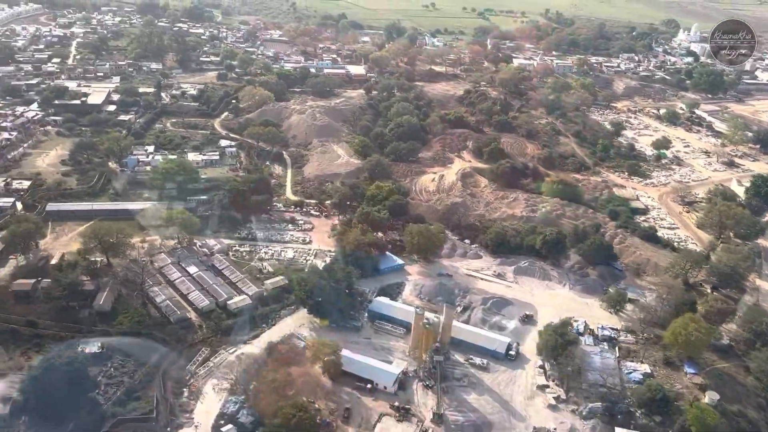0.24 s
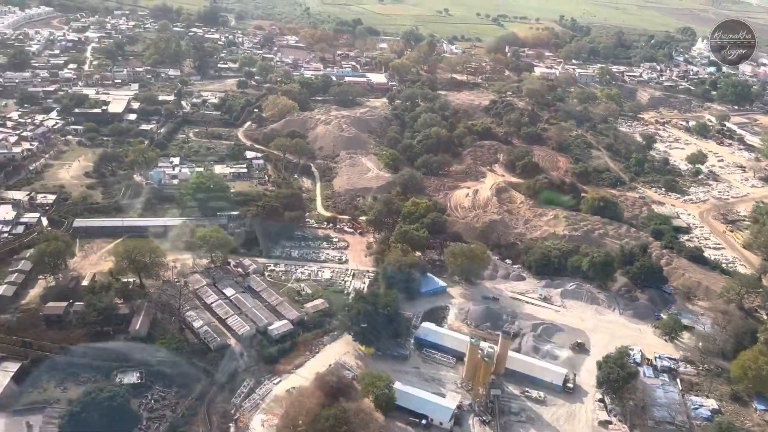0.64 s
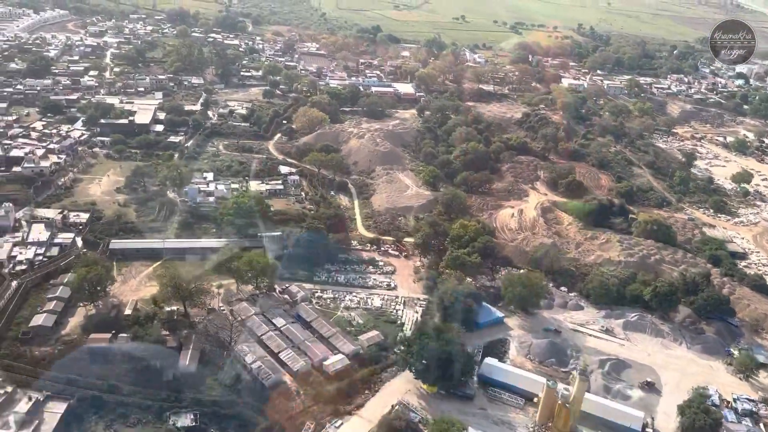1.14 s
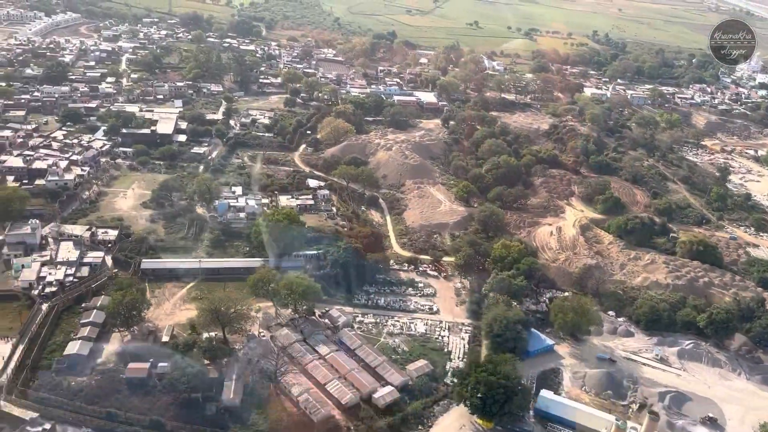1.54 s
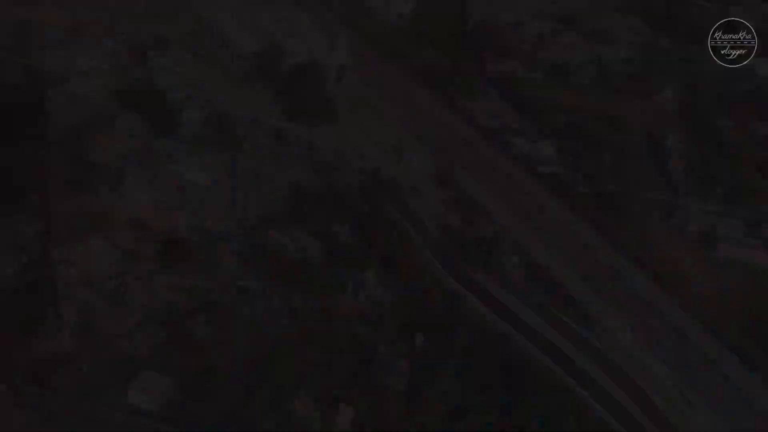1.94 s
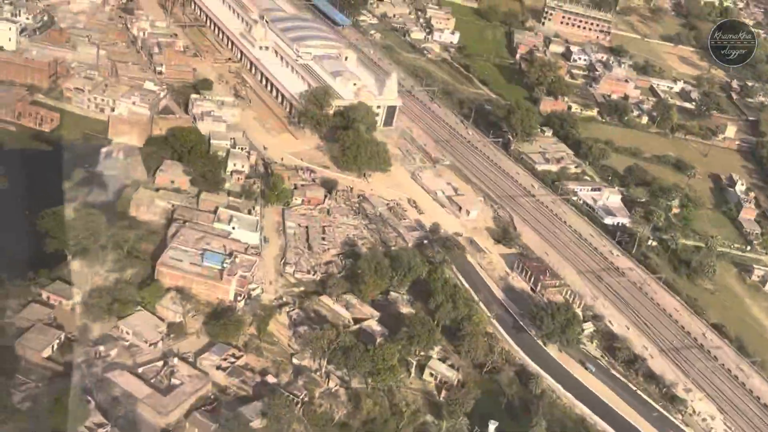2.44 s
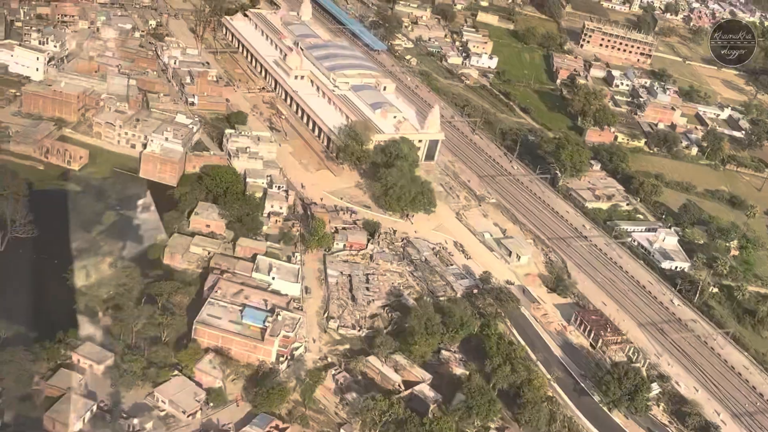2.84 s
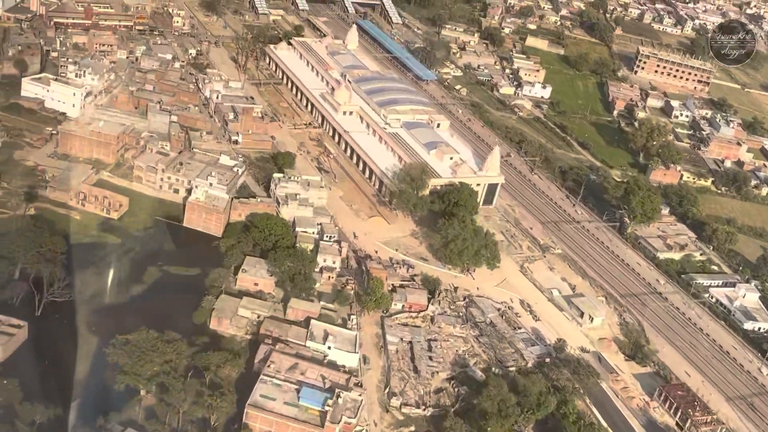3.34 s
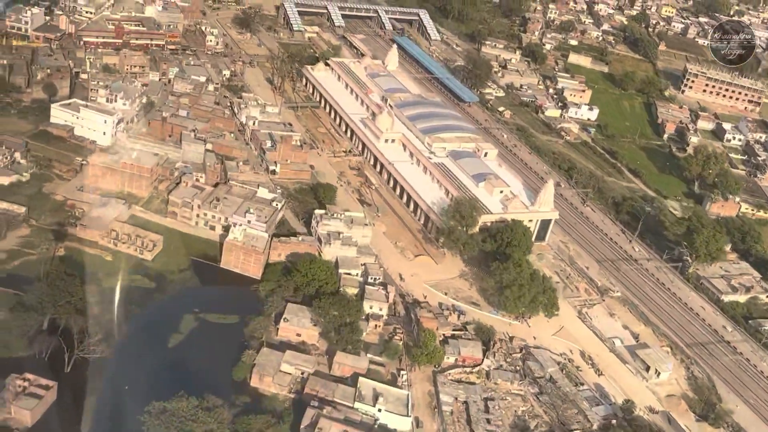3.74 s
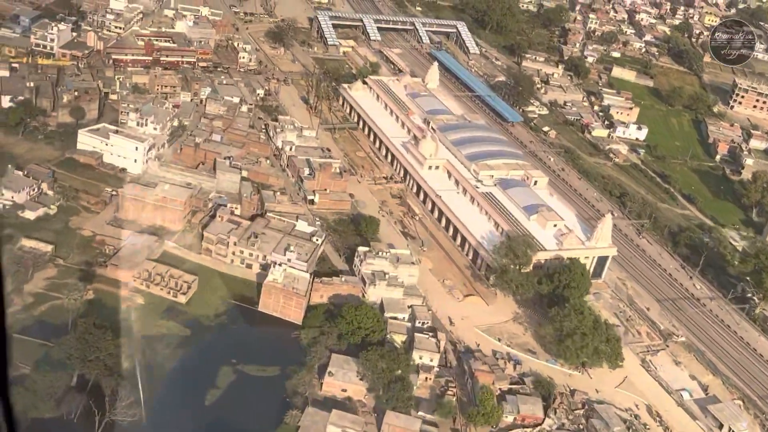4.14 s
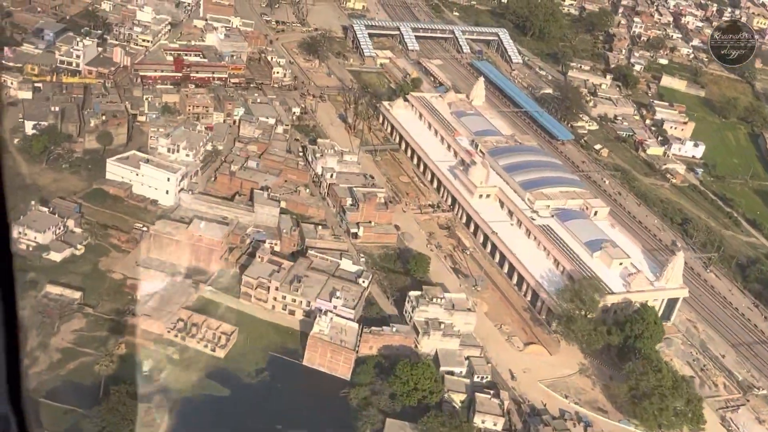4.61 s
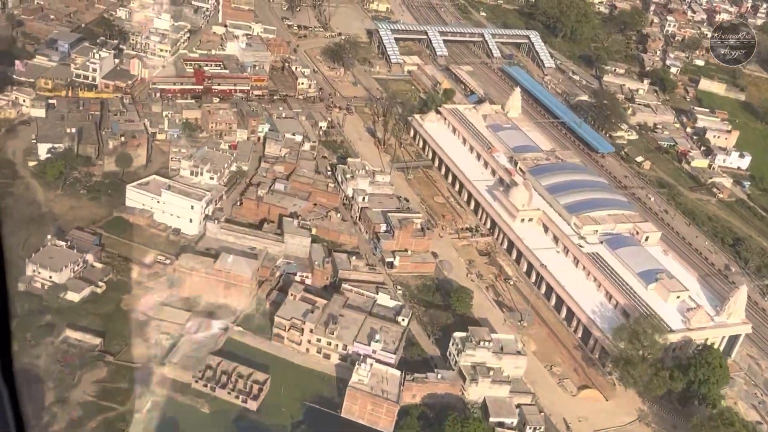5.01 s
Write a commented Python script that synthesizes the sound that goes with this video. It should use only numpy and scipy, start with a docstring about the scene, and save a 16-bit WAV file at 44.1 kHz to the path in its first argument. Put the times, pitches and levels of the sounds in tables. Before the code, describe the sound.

Heard from inside a flying helicopter, rapid blade beats blur into a heavy, bassy drone. Air hisses and spits through a window gap on each pass, over unsteady gear whine and brief resonant swells. The first passage fades out by two seconds; another rises at once, starting with less hiss and howl, then slowly building. The microphones sit in the cramped cabin, with wide, uneven stereo treble.

```python
"""A fast throb, some 19 beats a second, inside a cruising helicopter, miked at two ports in the cabin.
Two stretches of flight follow each other, the first fading out and the second fading in.
The throb is a stack of main rotor harmonics over coloured noise for the turbulent cabin rumble.
Each blade pushes a chuff of noise and ringing tones through a window gap that hisses and squeaks.
Gearbox and turbine whine in steady tones and howl in wandering bands; other narrow bands swell briefly."""
import sys
import numpy as np
from scipy import signal
from scipy.fft import rfft, irfft, next_fast_len
from scipy.io import wavfile

SR = 44100
rng = np.random.default_rng(int(sys.argv[2]) if len(sys.argv) > 2 else 0)


def unload_audio(sound):
    """Save the sound as a 16-bit wav file, at the path given as the first command line argument."""
    columns = np.transpose(np.atleast_2d(sound))
    # keep every value between -1 and 1, then stretch to whole-number steps
    steps = np.round(np.clip(columns, -1, 1) * 32767)
    wavfile.write(sys.argv[1], SR, steps.astype(np.int16))


N = 232495
T = np.arange(N) / SR   # time [s]
HZ = np.maximum(np.fft.rfftfreq(next_fast_len(N + N % 2, True), 1 / SR), 1)   # spectrum bins [Hz]
FFT_SIZE = 2 * len(HZ) - 2
LEFT_RIGHT = np.array([[.5], [-.5]])   # splits a left-right difference evenly between the ports


def from_db(db):
    """Decibels to gain."""
    return 10 ** (np.asarray(db) / 20)


def in_time(rows):
    """The columns of a curve at every sample."""
    s, *columns = np.transpose(rows)
    return [np.interp(T, s, column) for column in columns]


def in_frequency(rows):
    """The columns of a spectrum at every bin, joined along log frequency."""
    hz, *columns = np.transpose(rows)
    return [np.interp(np.log(HZ), np.log(hz), column) for column in columns]


def white():
    """The spectrum of white noise with unit power per Hz."""
    return rfft(rng.standard_normal(FFT_SIZE)) * np.sqrt(SR / 2)


def drift(rate_hz, count=32):
    """Slow chance with a spread of 1, drawn every count samples and joined by straight lines."""
    steps = np.arange(next_fast_len(N // count + 2)) * count
    hz = np.fft.rfftfreq(len(steps), count / SR)
    lowpass = 1 / (1 + (hz / rate_hz) ** 4)
    slow = irfft(rfft(rng.standard_normal(len(steps))) * lowpass, len(steps))
    return np.interp(np.arange(N), steps, slow / np.std(slow))


def wander(rate_hz):
    """Slow chance in both strength and phase."""
    return drift(rate_hz) + 1j * drift(rate_hz)


def at_ports(db_per_hz, ports):
    """Noise of a given colour as the two microphone ports hear it: partly shared, partly their own."""
    likeness, lead_rad, balance_db = in_frequency(ports)
    likeness = np.clip(likeness, 0, 1)
    shared = np.sqrt(likeness) * white() * np.exp(1j * lead_rad * LEFT_RIGHT)
    own = np.sqrt(1 - likeness) * np.array([white(), white()])
    return irfft((shared + own) * from_db(db_per_hz + balance_db * LEFT_RIGHT))[:, :N]


def since_blade(blades, delay_s=0):
    """Seconds before (negative) or after the nearest blade pass."""
    per_s, first_s = blades
    passes = (T - first_s - delay_s) * per_s
    return ((passes + .5) % 1 - .5) / per_s


def each_blade(blades):
    """A chance value that holds for one blade pass; spread about 1."""
    per_s, first_s = blades
    passes = np.round((T - first_s) * per_s).astype(int)
    values = np.sqrt(3) * rng.uniform(-1.1, 1, np.ptp(passes) + 1)
    return values[passes - passes[0]]


def rumble(blades, air, spectrum, cabin, ports, flutter_db=0.5, buffet_db=0.5, buffet_hz=12,
           panel_hz=480, follows_air=0.63):
    """Turbulence shakes the panels, the cabin colours it; the bass surges, the rush follows the airflow."""
    colour_db, = in_frequency(spectrum)
    for hz, width_hz, peak_db in cabin:
        colour_db = colour_db + peak_db / (1 + (2 * (HZ - hz) / width_hz) ** 2)

    # bass and rush cross over at panel_hz
    steepness = (HZ / panel_hz) ** 4
    bass = at_ports(colour_db - 10 * np.log10(1 + steepness), ports)
    rush = at_ports(colour_db - 10 * np.log10(1 + 1 / steepness), ports)

    downwash = np.cos(2 * np.pi * blades[0] * since_blade(blades, delay_s=0.0035))
    surge_db = flutter_db * downwash + buffet_db * drift(buffet_hz)
    airflow_db = in_time(air)[0] - np.mean(np.array(air)[:, 1])
    return bass * from_db(surge_db) + rush * from_db(follows_air * airflow_db)


def swells(steady=0.86, noisy_cycles=6.5, lead_rad_per_hz=0.00037):
    """Bands swell and die in a bell: short narrow ones tonal, long wide ones noisy; phase gap grows with Hz."""
    # narrow bands out of the drone, from low booms to thin whistles:
    # (time [s], half length [s], centre [Hz], width [Hz], level before the fades [dB rms])
    swell_rows = [(0.177, 0.084, 368, 12, -28), (.66, .07, 2040, 30, -48.5), (.72, .06, 3380, 35, -52),
                  (.8, 0.7, 1207, 18, -52), (1.05, .45, 1850, 300, -51), (0.947, 0.079, 401.5, 11, -30),
                  (1.05, .07, 369.6, 11, -29), (1.25, 0.051, 401, 11, -27), (1.27, .09, 2450, 150, -45),
                  (1.29, .06, 250, 10, -23), (1.34, 0.14, 105.3, 8.5, -20.5), (1.411, .17, 4750, 220, -49),
                  (1.41, .06, 1935, 30, -45.5), (1.766, 0.045, 1670, 22, -43), (2.156, 0.12, 380, 11, -26),
                  (2.55, 0.24, 160, 15, -28.5), (2.854, 0.059, 169.3, 12, -21), (3.08, .1, 106, 7.5, -26),
                  (3.207, .09, 376, 11, -29.5), (3.3, .08, 95, 8.3, -20), (3.5, 0.12, 78.14, 9, -22.5),
                  (3.626, 0.22, 376.5, 9, -30.5), (3.918, 0.055, 269, 10, -25), (4.1, .17, 165, 15, -26.5),
                  (3.97, 0.09, 107, 9.9, -25), (4.074, .06, 1318, 17, -42.5), (4.2, .1, 2270, 90, -46),
                  (4.65, .07, 1211, 16, -40), (4.657, .1, 155.2, 12, -23.5), (4.95, .35, 2233, 200, -46.5),
                  (4.75, 0.51, 798, 70, -44), (4.955, 0.071, 215, 8.4, -23.5)]
    out = np.zeros((2, N))
    for s, half_s, hz, width_hz, level_db in swell_rows:
        near = np.abs(T - s) < 3 * half_s
        t = T[near]
        tonal = np.clip(steady, 0, 1) / (1 + (width_hz * half_s / noisy_cycles) ** 2)
        body = np.sqrt(tonal) + np.sqrt((1 - tonal) / 2) * wander(width_hz)[near]
        ring = np.real(body * np.exp(1j * hz * (2 * np.pi * t + lead_rad_per_hz * LEFT_RIGHT)))
        bell = np.exp(-((t - s) / half_s) ** 2)
        out[:, near] += np.sqrt(2) * from_db(level_db) * bell * ring
    return out


def whine(tones, waver=0.22, waver_hz=5):
    """Steady mesh tones; standing waves make them waver differently at each port."""
    out = np.zeros((2, N))
    for hz, level_db, balance_db in tones:
        for channel, side in enumerate((.5, -.5)):
            path = 1 + waver * wander(waver_hz)
            tone = np.real(path * np.exp(2j * np.pi * hz * T + 1j * side))
            out[channel] += np.sqrt(2) * from_db(level_db + side * balance_db) * tone
    return out


def howl(curve, level_db, likeness, width_hz, balance_db, offset_hz=0, waver_hz=13, broken_db=1.0):
    """A narrow band of gear noise whose centre wanders and undulates and whose level breaks up."""
    centre_hz, curve_db = in_time(curve)
    hz = centre_hz + offset_hz + waver_hz * drift(6.98)
    carrier = np.exp(2j * np.pi * np.cumsum(hz) / SR)
    mid = np.real(carrier * wander(width_hz))
    side = np.real(carrier * wander(width_hz))

    # likeness of the ports: 1 is equal, -1 is opposite
    likeness, signs = np.clip(likeness, -1, 1), 2 * LEFT_RIGHT
    pair = (np.sqrt(1 + likeness) * mid + np.sqrt(1 - likeness) * side * signs) / np.sqrt(2)
    return pair * from_db(curve_db + level_db + broken_db * drift(13) + LEFT_RIGHT * balance_db)


def squeaks(blades, level_db, centre_hz, lead_s, half_s=.0042, spread_hz=380, glide_hz_per_s=55000,
            uneven_db=5, rough=.4):
    """Just ahead of a blade the gap whistles for an instant, each time with its own pitch, glide, strength."""
    age = since_blade(blades, delay_s=-lead_s * (1 + .5 * each_blade(blades)))
    hz = centre_hz + spread_hz * each_blade(blades) + glide_hz_per_s * each_blade(blades) * age
    carrier = np.exp(2j * np.pi * np.cumsum(hz) / SR)
    tone = np.sqrt(2) * np.real(carrier * (1 + rough * wander(250)))
    opposite_ports = 2 * LEFT_RIGHT
    bell = np.exp(-(age / half_s) ** 2)
    return opposite_ports * tone * bell * from_db(level_db + uneven_db * each_blade(blades))


def gusts():
    """Extra push of the air in dB: each gust swells and dies away as a bell."""
    # gusts, in which the blades chuff harder: (time [s], half length [s], extra level [dB])
    gust_rows = [(0.092, .06, 4.5), (.25, 0.08, 3.5), (.43, 0.069, 4), (.52, 0.034, 3), (.73, .06, 0.5),
                 (.94, 0.063, 3.5), (1.154, 0.033, 5), (1.26, .05, 6), (1.41, .04, 2.5), (1.522, 0.056, 7),
                 (1.66, 0.032, 4.5), (1.76, .03, 2), (2.116, .04, 2), (2.195, .033, 9), (2.37, .03, 4),
                 (2.71, 0.037, 7.5), (2.9, .04, 1.5), (2.99, .03, 6.5), (3.197, 0.15, 4.5), (3.55, .1, 4),
                 (3.872, .15, 3.5), (4.204, 0.039, 7.5), (4.39, .025, 3), (4.798, 0.4, 4.5), (5.2, 0.07, 1)]
    return sum(extra_db * np.exp(-((T - s) / half_s) ** 2) for s, half_s, extra_db in gust_rows)


def standing_waves(count=12, longest_s=.012):
    """Short reflections off glass and panels ripple the spectrum; spread about 1."""
    delays_s = rng.uniform(0, longest_s, (count, 1))
    return np.cos(2 * np.pi * HZ * delays_s).sum(0) * np.sqrt(2 / count)


def gap_ring(spread_hz=170):
    """The gap's resonances: firm in strength, unsteady in pitch."""
    # resonances that every chuff rings in the gap:
    # (frequency [Hz], level before the ring and chuff levels [dB], left-right [dB])
    gap_modes = [(2400, 1.7, 2), (4930, -2.6, -.5)]
    out = 0
    for hz, level_db, balance_db in gap_modes:
        tone = np.cos(2 * np.pi * np.cumsum(hz + spread_hz * drift(209.5)) / SR)
        out = out + np.sqrt(2) * from_db(level_db + LEFT_RIGHT * balance_db) * tone
    return out


def window_gap(blades, air, gap, spread, hiss_db, chuff_db, ring_db, lead_db, decay_s, lead_s, rise_s=.0013,
               uneven_db=.5, flicker_db=0.66, ripple_db=0.77, chuff_follows_air=1.7, hiss_follows_gust=.03):
    """Air hisses through the gap, swells ahead of each blade, then spits a ringing chuff led by air and gusts."""
    air_db, gust_db = in_time(air)[0], gusts()
    mean_db = air_db.mean()
    hiss_colour, chuff_colour = in_frequency(gap) + ripple_db * standing_waves()

    ahead = np.exp(-(since_blade(blades, delay_s=-lead_s) / 0.0062) ** 2)
    hiss_level = air_db + hiss_follows_gust * gust_db + hiss_db
    hiss_level = hiss_level + lead_db * ahead + flicker_db * drift(45)
    hiss = at_ports(hiss_colour, spread) * from_db(hiss_level)

    age = since_blade(blades, delay_s=0.00046 * drift(6.6))   # the chuffs come slightly unevenly
    puff = np.exp(-np.where(age < 0, (age / rise_s) ** 2, age / decay_s))   # quick rise, slower fall
    chuff_level = mean_db + chuff_follows_air * (air_db - mean_db) + gust_db
    chuff_level = chuff_level + chuff_db + uneven_db * each_blade(blades)
    ringing = at_ports(chuff_colour, spread) + from_db(ring_db) * gap_ring()
    return hiss + ringing * puff * from_db(chuff_level)


def rotor(blades, throb, waver=0.15, right_db=2.0, smear_rad=1.3):
    """Blade pressure harmonics waver in turbulent air; the cabin smears each thump into a drone."""
    out, start_rad = 0, 2 * np.pi * rng.random()
    for order, level_db in enumerate(throb, 1):
        phase = 2 * np.pi * order * blades[0] * T + smear_rad * order ** 2 + start_rad
        wave = np.real(np.exp(1j * phase) * (1 + waver * wander(2.3)))
        out = out + np.sqrt(2) * from_db(level_db) * wave
    return out * from_db(-right_db * LEFT_RIGHT)


def first_stretch():
    """Flight in a nearly steady airflow, with a lower gear band that swells."""
    # blade passes: (rate [per s], time of one pass [s])
    blades = (19.357, .0041)
    # rotor harmonics at 1, 2, 3 .. times the blade rate: level before waver and balance [dB rms]
    throb = [-55, -29, -29, -24, -33, -32.5, -37.5, -38]
    # airflow past the cabin: (time [s], level before the gap's offsets [dB])
    air = [(0, -42.5), (.9, -42), (1.3, -42), (1.55, -42.5), (1.95, -43)]
    # cabin rumble: (frequency [Hz], level [dB per Hz])
    spectrum = [(15, -72), (30, -54), (48, -48), (66, -40.5), (105, -40), (160, -42), (215, -45),
                (320, -49), (510, -51.5), (720, -60), (1000, -64), (1550, -68.5), (2100, -73.5),
                (3500, -99.5)]
    # cabin resonances and the nulls between them: (frequency [Hz], width [Hz], level [dB])
    cabin = [(257, 44, 2.5), (402, 39, 3), (452, 28, -3.5), (804, 70, 1.5), (1090, 36, 1), (1120, 54, -4.5)]
    # sound field at the two ports: (frequency [Hz], likeness [0-1], left leads [rad], left-right [dB])
    ports = [(45, 0.94, -0.5, -5), (90, 0.96, 0, 1), (170, 0.82, 0, 0.7), (350, 0.82, 0.46, -4),
             (483, 0.67, 0.3, -0.8), (677, 0.35, -2.5, -5), (820, 0.42, -0.9, -2.5), (1024, 0.71, -4, -1),
             (1350, 0.4, -4, 2.5), (1800, 0.08, -5, 2.5)]
    # colour of the gap at a level of 0 dB: (frequency [Hz], hiss [dB per Hz], chuff [dB per Hz])
    gap = [(600, -46, -47), (1310, -34, -27), (2000, -36, -35), (2530, -33.5, -30), (3400, -34, -38),
           (4400, -35, -31), (5500, -41.5, -46), (7100, -43.5, -40), (9100, -45.5, -43), (11200, -46, -35),
           (12800, -55, -59), (15500, -58, -61)]
    # treble stereo spread: likeness, phase lead and balance of left and right at each frequency:
    # (frequency [Hz], likeness [0-1], left leads [rad], left-right [dB])
    treble_spread = [(1800, 0.32, 1, 4.5), (2580, 0.4, -0.5, -1.5), (4500, 0.12, 0.5, -4.5),
                     (5500, .2, -3, -7.5), (6460, 0.3, -3.1, 0), (7700, 1, -1, 0), (10000, 1, 0.5, 0),
                     (11900, 0.97, 2.5, 0), (14100, 1, 11, -2), (15300, .85, -6, 0)]
    # gear and turbine tones: (frequency [Hz], level before waver [dB rms], left-right [dB])
    tones = [(377.4, -39, 1), (649, -46.5, -10), (1700, -49.5, 4), (3210, -61.5, 0), (10627, -74, 0)]
    # the drive train's rough howl: (time [s], centre [Hz], level before each layer's offset [dB])
    howl_curve = [(0, 1288, -40), (.7, 1288, -41), (1.08, 1295, -39), (1.3, 1270, -41), (1.9, 1276, -43)]
    # the lower gear band: (time [s], centre [Hz], level before its offset [dB])
    moan_curve = [(0, 639, -53), (.22, 643, -48), (.35, 642, -40), (.5, 637.6, -50), (1.2, 641, -49),
                  (1.38, 652, -34), (1.47, 635, -36), (1.62, 638, -48)]
    return (rumble(blades, air, spectrum, cabin, ports)
            + whine(tones)
            + howl(howl_curve, level_db=-1.0, likeness=-0.38, width_hz=83, balance_db=1.5)
            + howl(howl_curve, level_db=-5.0, likeness=-.3, width_hz=8.4, balance_db=0.0)
            + howl(moan_curve, level_db=1.5, likeness=-0.18, width_hz=22, balance_db=-4)
            + squeaks(blades, level_db=-50, centre_hz=11400, lead_s=.006)
            + window_gap(blades, air, gap, treble_spread, hiss_db=-1.37, chuff_db=.2, ring_db=-7.5,
                         lead_db=1.1, decay_s=0.0039, lead_s=.019)
            + rotor(blades, throb))


def second_stretch():
    """Flight in a slowly building airflow, with a howl that wanders further."""
    # blade passes: (rate [per s], time of one pass [s])
    blades = (19.339, .0445)
    # rotor harmonics at 1, 2, 3 .. times the blade rate: level before waver and balance [dB rms]
    throb = [-51, -30, -31.5, -25.5, -29.5, -42, -56, -33.5]
    # airflow past the cabin: (time [s], level before the gap's offsets [dB])
    air = [(2.0, -45.5), (3.2, -45), (4.15, -43.9), (5.27, -44)]
    # cabin rumble: (frequency [Hz], level [dB per Hz])
    spectrum = [(15, -73), (30, -67), (48, -44), (66, -43.3), (102, -40), (130, -43), (200, -43),
                (320, -50), (510, -54), (720, -63.5), (1000, -66.5), (1550, -70.5), (2100, -78.5),
                (3500, -100)]
    # cabin resonances and the nulls between them: (frequency [Hz], width [Hz], level [dB])
    cabin = [(158.8, 32, 3), (271, 38, 3.5), (395, 57, 2.5), (449, 21, -3), (489, 34, 2.5), (1084, 40, 2.5),
             (1135, 55, -2.5)]
    # sound field at the two ports: (frequency [Hz], likeness [0-1], left leads [rad], left-right [dB])
    ports = [(45, 0.96, 0, -3), (90, 0.9, -0.048, 0.5), (170, 0.9, 0, 0), (352, 0.93, -0.051, -3.5),
             (466, 0.81, 0.013, -1.7), (680, 0.54, -0.54, -2.5), (836, 0.41, -0.58, -6),
             (1010, 0.058, -0.64, -1.5), (1360, 0.46, .4, 4), (1790, 0.34, 1, 1.5)]
    # colour of the gap at a level of 0 dB: (frequency [Hz], hiss [dB per Hz], chuff [dB per Hz])
    gap = [(600, -46, -36), (1290, -36.5, -22), (1800, -31, -32.5), (2250, -28.5, -26.5),
           (3060, -32.5, -33.5), (3620, -33.5, -39), (3950, -36, -38), (4400, -35.5, -35.5),
           (4920, -38.5, -36.5), (5800, -40.5, -37), (6700, -47, -41), (9000, -44.2, -43.5),
           (11500, -44.5, -37.5), (13000, -51, -46), (15500, -49, -56)]
    # treble stereo spread: likeness, phase lead and balance of left and right at each frequency:
    # (frequency [Hz], likeness [0-1], left leads [rad], left-right [dB])
    treble_spread = [(1800, 0.53, 0.2, 0.5), (2600, 0.8, -1, 4), (3600, 1, -1, 0), (5000, 1, -1, -0.5),
                     (5320, 0.48, 3.5, 0), (6500, 1, 1, 0), (7700, 1, 6, 0), (9800, 1, 6.5, 0),
                     (11930, 1, 9, -0.5), (13700, 1, 8, 0), (15000, .8, 14.5, 0)]
    # gear and turbine tones: (frequency [Hz], level before waver [dB rms], left-right [dB])
    tones = [(374.5, -39.5, 10.5), (642.6, -47.5, -14.5), (1704, -55.5, -3), (3240, -63.5, -13)]
    # the drive train's rough howl: (time [s], centre before offset [Hz], level before offset [dB])
    howl_curve = [(2.0, 1271, -48), (2.55, 1265, -42.5), (3.05, 1297, -44.5), (3.35, 1285, -46.5),
                  (3.65, 1347, -43), (3.82, 1310, -41), (4.02, 1335, -41.5), (4.17, 1305, -40),
                  (4.27, 1325, -38), (4.44, 1280, -38), (4.66, 1245, -40), (4.9, 1255, -41),
                  (5.1, 1245, -40)]
    return (rumble(blades, air, spectrum, cabin, ports)
            + whine(tones)
            + howl(howl_curve, level_db=-2.0, likeness=0.56, width_hz=100, balance_db=-1.5, offset_hz=10)
            + howl(howl_curve, level_db=-7.0, likeness=0.64, width_hz=13, balance_db=1.0)
            + squeaks(blades, level_db=-51, centre_hz=11800, lead_s=.008)
            + window_gap(blades, air, gap, treble_spread, hiss_db=-1.26, chuff_db=0.8, ring_db=-1.0,
                         lead_db=0.6, decay_s=0.0031, lead_s=0.011)
            + rotor(blades, throb))


def patchy(sound, patchy_db=0.74, rate_hz=7, low_hz=900, high_hz=13000, count=14):
    """The treble flickers in patches: each narrow band rises and falls on its own."""
    spectrum, out = rfft(sound, FFT_SIZE), sound
    place = np.log(HZ / low_hz) / np.log(high_hz / low_hz) * (count - 1)
    for k in range(count):
        triangle = np.maximum(1 - np.abs(place - k), 0)
        band = irfft(spectrum * triangle)[:, :N]
        out = out + band * (from_db(patchy_db * drift(rate_hz)) - 1)
    return out


def scene():
    """The two stretches of flight, joined by a fade through silence."""
    # end of the first stretch: (time [s], gain [0-1])
    fade_out_rows = [(1.54, 0.99), (1.947, 0)]
    # start of the second stretch: (time [s], gain [0-1])
    fade_in_rows = [(1.947, 0.0064), (2.34, 1)]
    fade_out = in_time(fade_out_rows)[0]
    fade_in = in_time(fade_in_rows)[0] * (T > fade_in_rows[0][0])   # silent until its first row
    flight = first_stretch() * fade_out + second_stretch() * fade_in
    return patchy(flight + swells() * (fade_out + fade_in))


def record(dry):
    """A steep elliptic low-pass cuts the top above 15.9 kHz."""
    lowpass = signal.ellip(10, .1, 80, 15900, fs=SR, output="sos")   # order, ripple [dB], stop [dB], [Hz]
    return signal.sosfilt(lowpass, dry)


dry = scene()
out = record(dry)
unload_audio(out)
```